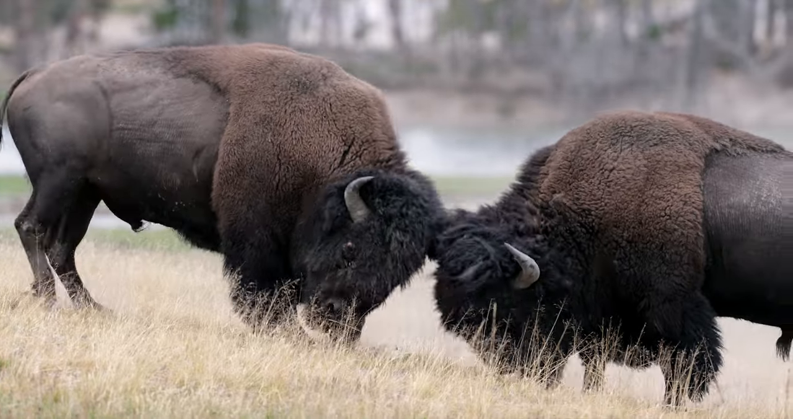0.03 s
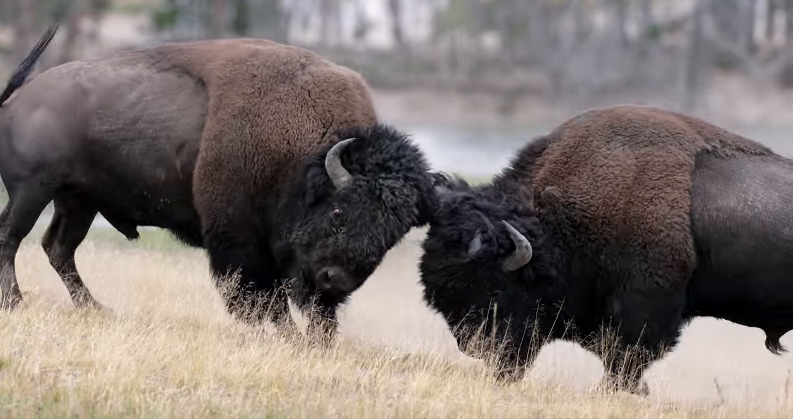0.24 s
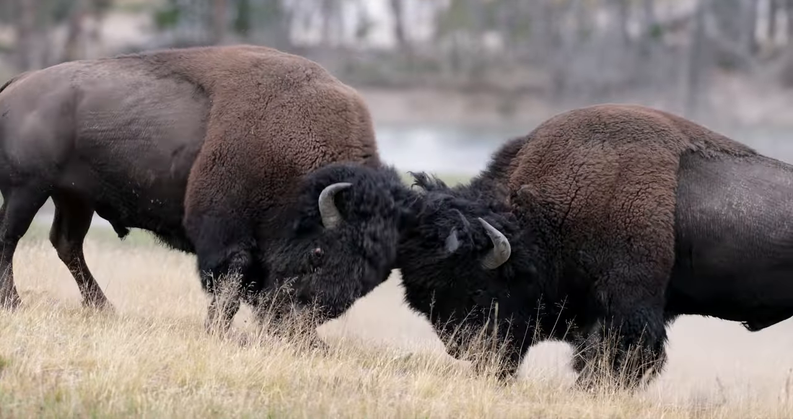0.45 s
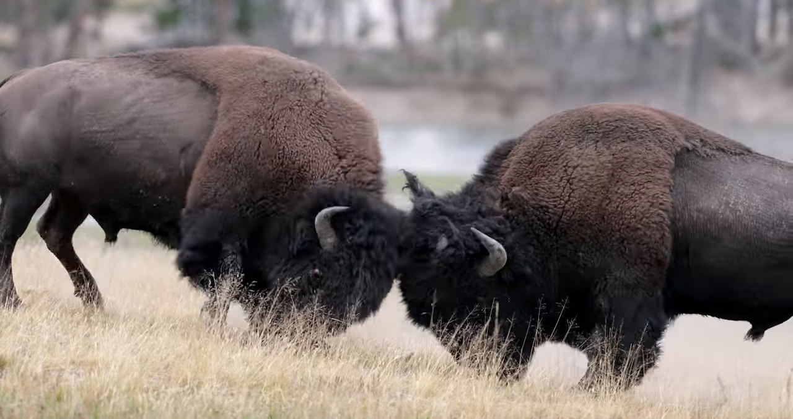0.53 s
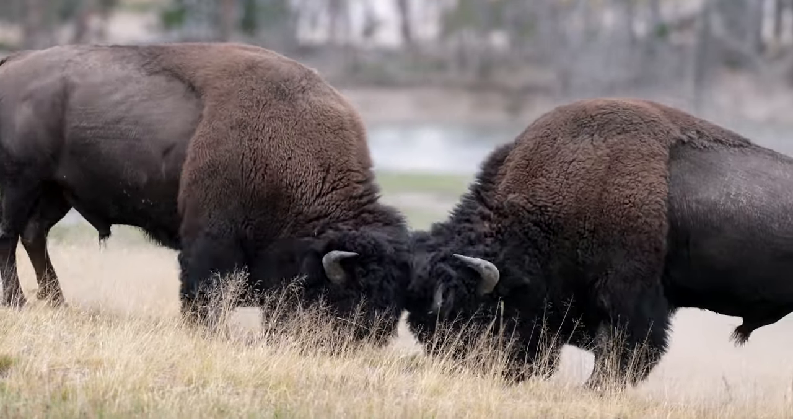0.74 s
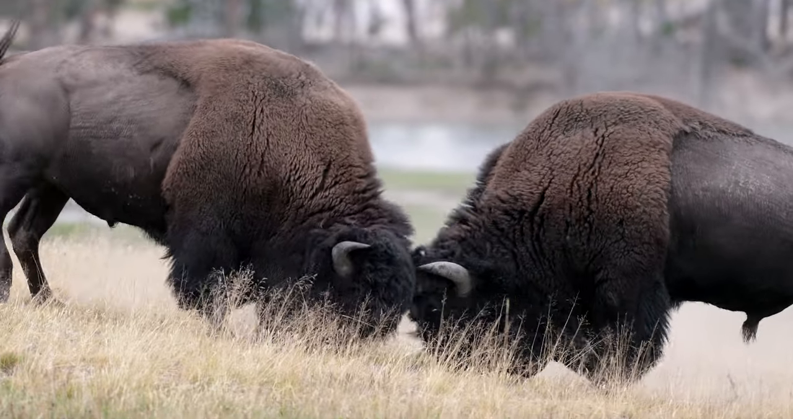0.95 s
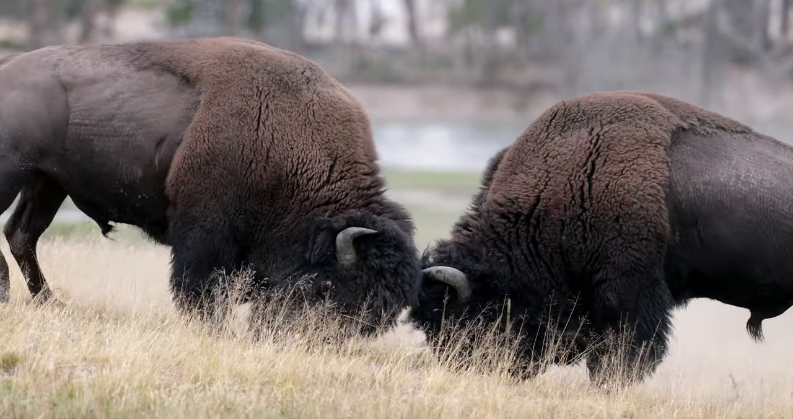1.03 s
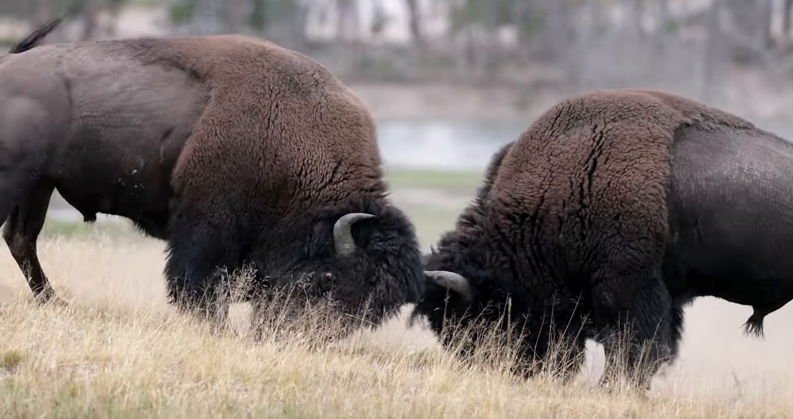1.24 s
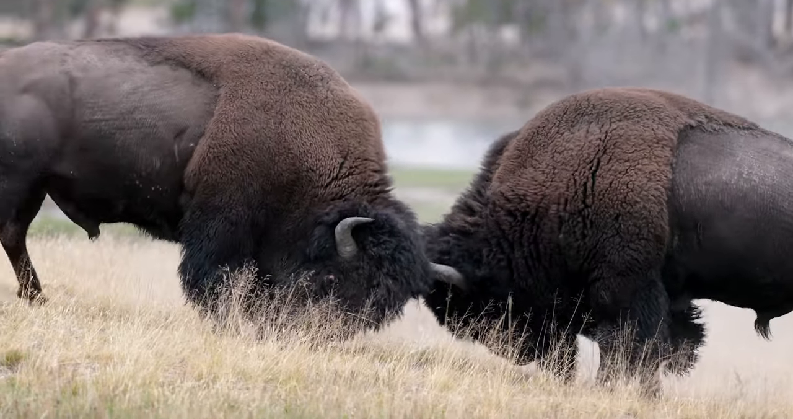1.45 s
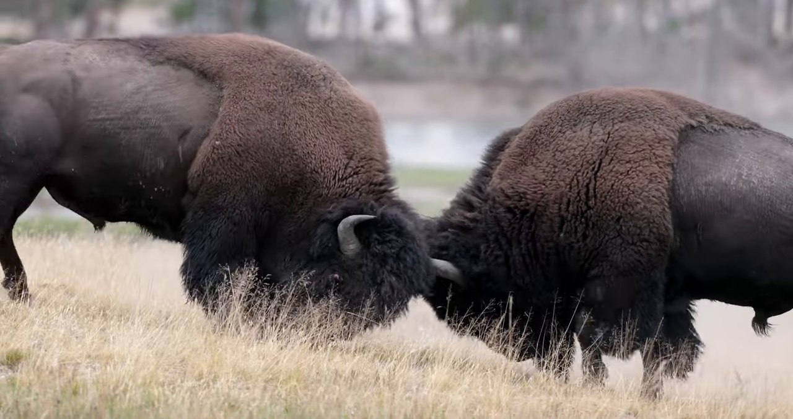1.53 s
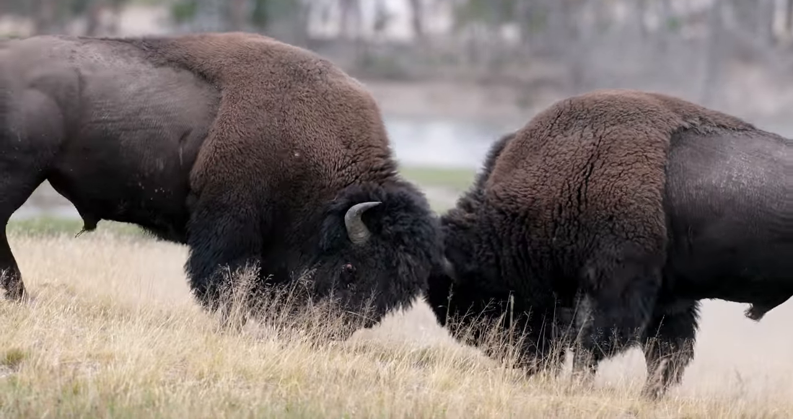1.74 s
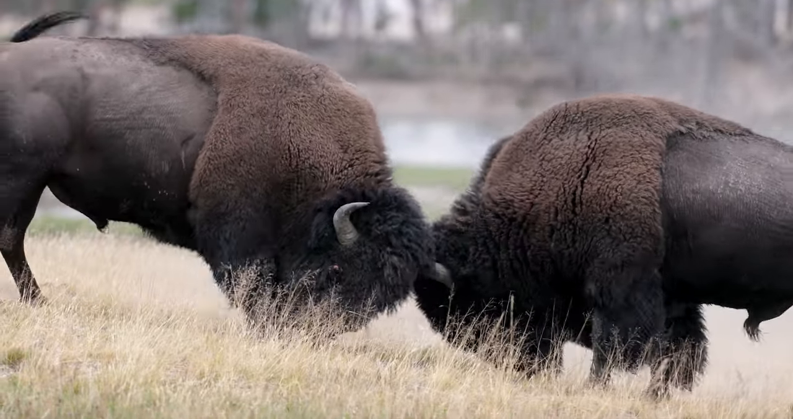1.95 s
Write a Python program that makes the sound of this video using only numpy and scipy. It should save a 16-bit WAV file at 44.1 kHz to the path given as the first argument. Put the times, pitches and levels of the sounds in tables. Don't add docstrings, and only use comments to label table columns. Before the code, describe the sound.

A bull bison bellows once, close and dry: quick nostril snorts, then a deep pulsing growl with breathy hiss, slackening into irregular throat flaps and a faint sigh. Low wind rumbles outdoors; sound only on the left.

```python
import sys
import numpy as np
from scipy import signal
from scipy.fft import rfft, irfft, next_fast_len
from scipy.io import wavfile
from scipy.ndimage import uniform_filter1d, map_coordinates

SR = 44100
rng = np.random.default_rng(int(sys.argv[2]) if len(sys.argv) > 2 else 0)


def digitize_waveform(pressure):
    field = np.atleast_2d(pressure).T
    bounded = np.clip(field, -1, 1)
    quanta = np.round(bounded * 32767).astype(np.int16)
    wavfile.write(sys.argv[1], SR, quanta)


def magnitude_from_level(level_db):
    exponent = np.asarray(level_db, float) / 20
    return 10 ** exponent


N = 88200
TIME = np.arange(N) / SR

# time_s, body_level_db, mouth_level_db, rasp_level_db
VOICE_LEVELS = [(0.03, -71, -43.5, -76), (0.192, -39, -35, -66), (0.28, -30, -28, -56.5),
                (0.354, -26.5, -31, -53.5), (0.414, -18.5, -27, -54.5), (0.482, -23.5, -30, -57),
                (0.556, -17.5, -31, -53), (0.624, -22.5, -28, -56.5), (0.75, -19, -33, -59.5),
                (0.87, -26, -34, -61), (0.974, -24, -33.5, -64), (1.035, -24, -35.5, -63),
                (1.094, -21, -30, -70.5), (1.164, -18.5, -43, -69), (1.3, -28, -39, -69.5)]
# time_s, flaps
FLAP_COUNT = [(.04, 0), (.159, 7), (.311, 16), (.395, 21), (.449, 24), (.513, 28), (.586, 32), (.666, 37),
              (.773, 43), (.853, 48), (.923, 52), (1.003, 57), (1.057, 60), (1.123, 63), (1.222, 68),
              (1.271, 71), (1.318, 73), (2, 105)]
# freq_hz, level_db
RASP_COLOUR = [(3000, -52.5), (4200, -9.5), (5000, -11.5), (6500, -15), (8000, -28.5), (11000, -29),
               (15000, -68)]
SLACKENS_S = 1.36
WINDPIPE_SOFT_HZ = 464
SHIVER_DB = 2.4


def folds():
    jitter = 0.02
    scatter_db, alternate_db = 1.6, 1.6
    leak = 0.6
    body_db, mouth_db, rasp_db = curves(VOICE_LEVELS)
    at = np.flatnonzero(np.diff(np.floor(curves(FLAP_COUNT)[0])))
    at = at[at < VOICE_LEVELS[-1][0] * SR]
    timing_luck, level_luck = rng.standard_normal((2, len(at)))
    shift = np.round(jitter * timing_luck * np.gradient(at)).astype(int)
    pulses = np.zeros(N)
    pulses[at + shift] = magnitude_from_level(scatter_db * level_luck + alternate_db * (-1) ** np.arange(len(at)))

    body = chest(pulses)
    voice = patchy(mouth(puffed(pulses, 6.3)), SHIVER_DB)
    rasp_air = unit(gust(pulses)) + leak * rng.standard_normal(N)
    rasp = patchy(filtered(rasp_air, colour(RASP_COLOUR)), SHIVER_DB)
    layers = zip((body_db, mouth_db, rasp_db), (body, voice, rasp))
    return sum(magnitude_from_level(db) * x / x[SR // 4:SR].std() for db, x in layers)


def ring():
    # start_s, rise_s, fall_s, peak_db
    swells = [(0.054, 0.096, 0.028, -22.5), (0.152, 0.025, 0.046, -25.5), (0.212, 0.059, 0.015, -10),
              (0.27, 0.098, 0.0083, -4), (0.372, 0.0349, 0.017, -3.5), (0.417, 0.025, 0.035, -8.5),
              (0.45, 0.0046, 0.12, -6.5), (0.499, 0.047, 0.032, -7.5), (0.579, 0.038, 0.069, -3.5),
              (0.665, 0.066, 0.047, -3), (0.756, 0.046, 0.061, -5), (0.85, 0.0017, 0.063, -10),
              (0.919, 0.027, 0.13, -6.5), (1.06, 0.0057, 0.11, -8.5), (1.12, 0.027, 0.15, -7),
              (1.272, 0.0067, 0.047, -7), (1.325, 0.03, 0.048, -18), (1.375, 0.0044, 0.039, -16),
              (1.401, 0.0053, 0.037, -10), (1.432, 0.0084, 0.03, -13), (1.466, 0.0053, 0.046, -21.5),
              (1.494, 0.004, 0.035, -14), (1.541, 0.0098, 0.015, -17), (1.568, 0.0097, 0.0093, -26.5),
              (1.588, 0.01, 0.058, -23), (1.631, 0.0062, 0.069, -23.5), (1.702, 0.03, 0.043, -18.5),
              (1.731, 0.013, 0.085, -24), (1.803, 0.0078, 0.058, -20.5), (1.971, 0.0029, 0.029, -27.5)]
    # time_s, pitch_hz
    ring_pitch = [(.05, 200), (.1, 214.5), (.15, 229), (.25, 241), (.36, 241.4), (.48, 246.9), (.58, 236.6),
                  (.72, 232), (.84, 230.6), (.96, 235.3), (1.08, 227.4), (1.2, 234), (1.32, 224.8),
                  (1.44, 233.4), (1.6, 227.6), (1.9, 224)]
    # time_s, level_db
    octave_level = [(0, -36), (1.5, -32.5), (1.58, -21.5), (2, -22)]
    # start_s, length_s, pitch_hz, level_db
    hums = [
        (0.11, 0.031, 705, -35),
        (.174, .03, 676, -31),
    ]
    level = 0
    for start, rise, fall, db in swells:
        up = np.clip((TIME - start) / rise, 0, 1) ** 0.47
        down = np.cos(np.pi / 2 * np.clip((TIME - start - rise) / fall, 0, 1)) ** 2.06
        level = level + magnitude_from_level(db) * up * down * np.exp(1.1j * rng.standard_normal())
    sag = uniform_filter1d(1 + 0.15 * (1 - 2 * (curves(FLAP_COUNT)[0] % 1)), size=130)
    phase = 2 * np.pi * np.cumsum(curves(ring_pitch)[0]) / SR + 0.38 * wobble(40)
    tone = level * sag * np.exp(1j * phase)
    octave = (tone ** 2 / (abs(tone) + 0.011)).imag
    hum = sum(magnitude_from_level(db) * arch(s, length) * np.sin(2 * np.pi * hz * TIME) for s, length, hz, db in hums)
    return filtered(tone.imag, soft(1200)) + magnitude_from_level(curves(octave_level)[0]) * filtered(octave, soft(1300)) + hum


def slaps():
    # time_s, peak_db
    cracks = [(0.087, -35), (0.106, -31.5), (0.158, -34.5), (0.178, -28.5), (0.207, -30.5), (0.231, -23),
              (0.245, -31), (0.28, -29.5), (0.432, -24), (0.532, -28.5), (0.566, -27), (1.003, -37.5),
              (0.395, -37.5), (0.414, -24.5), (0.45, -22.5), (0.48, -21.5), (0.666, -24.5), (0.719, -23.5),
              (0.756, -21.5), (0.851, -23.5), (1.056, -20.5), (1.124, -19), (1.162, -24.5), (1.222, -30.5),
              (1.269, -25), (1.293, -23.5), (1.319, -37), (1.337, -27), (1.374, -22), (1.402, -19.5),
              (1.435, -26), (1.463, -21.5), (1.491, -25.5), (1.527, -27), (1.565, -29.5), (1.708, -45),
              (1.732, -35.5)]
    # freq_hz, width_hz, level_db
    back_throat = [
        (944, 62, 2),
        (1177, 77, -2),
        (550, 90, -8),
    ]
    thump_db, crack_db, rasp_db, knock_db = 0.5, 0.5, -31, -7.5
    hits = np.zeros(N)
    for s, db in cracks:
        hits[round(s * SR)] = magnitude_from_level(db)

    def knocked(x):
        return filtered(x, lambda f: tube(back_throat)(f) * soft(1500)(f))

    def rasped(x):
        return filtered(x, colour(RASP_COLOUR))

    def peak(resonator):
        return abs(resonator(signal.unit_impulse(N, N // 2))).max()

    slack_boost = magnitude_from_level(10 * (TIME > 1.1))
    thump = chest(-hits * slack_boost) / peak(chest)
    crack = patchy(mouth(puffed(hits, 5.67 * 2.29)), SHIVER_DB / 2) / peak(mouth)
    rasp = rasped(gust(hits)) / peak(rasped)
    knock = knocked(hits * (TIME < SLACKENS_S)) / peak(knocked)
    return magnitude_from_level(thump_db) * thump + magnitude_from_level(crack_db) * crack + magnitude_from_level(rasp_db) * rasp + magnitude_from_level(knock_db) * knock


def puffed(pulses, click):
    return click * filtered(pulses, soft(650)) + magnitude_from_level(-9) * gust(pulses)


def gust(pulses):
    puff_s = 0.004
    t = np.arange(SR // 30) / SR
    shape = t / puff_s * np.exp(-2 * t / puff_s)
    level = signal.fftconvolve(lagged(pulses), 2.03 * shape / np.linalg.norm(shape))[:N]
    return level * rng.standard_normal(N)


def lagged(pulses):
    longest_lag_s, spread_db = 0.003, 7.9
    at = np.flatnonzero(pulses)
    lag_luck, size_luck = rng.random((2, len(at)))
    late = np.zeros(N)
    late[at + (longest_lag_s * SR * lag_luck).astype(int)] = pulses[at] * magnitude_from_level(spread_db * (size_luck - 0.5))
    return late


def chest(x):
    # freq_hz, width_hz, level_db
    chest_modes = [
        (256.8, 68, 1),
        (114, 129, -5),
        (414.4, 31, -14),
    ]
    low_cut_hz = 74
    return filtered(x, lambda f: tube(chest_modes)(f) * soft(WINDPIPE_SOFT_HZ)(f)
                    * (1j * f / (low_cut_hz + 1j * f)) ** 2)


def mouth(x):
    # freq_hz, width_hz, level_db
    shut = [(584, 22, -15), (914, 58, 2), (1150, 100, -1.5), (1338, 83, 1), (1700, 150, -6),
            (1776, 53, 0.5), (2050, 150, -7.5), (2430, 54, -7), (2636, 65, -18), (2994, 160, -12),
            (4700, 1200, -51.5)]
    # freq_hz, width_hz, level_db
    wide = [(549, 33, -1), (919, 47, 7.5), (1146, 119, 6.5), (1447, 156, 1.5), (1597.4, 26.7, 8.5),
            (1778, 90.5, 4), (1982, 177, -1), (2290, 210, -5), (2590, 140, -6), (2773, 130, -6.5),
            (3140, 170, -13), (3480, 170, -16), (5330, 580, -33), (5270, 1600, -46.5)]
    # freq_hz, width_hz, level_db
    slack = [(538, 16, -12.5), (893, 48, -8), (1220, 57, -2.5), (1540, 140, 0.5), (1910, 167, -2),
             (2300, 170, -4.5), (2620, 150, -5.5), (3010, 150, -9), (5310, 900, -51.5)]
    # freq_hz, level_db
    lips = [(300, 7.5), (1000, -5.5), (3300, 1.5), (3900, -9), (4600, 4), (7500, -9.5), (12000, -13.5)]
    opens_s, glide_s = 0.32, 0.1
    opened, slackened = [np.clip((TIME - s) / glide_s + 0.5, 0, 1) for s in (opens_s, SLACKENS_S)]
    shapes = zip((shut, wide, slack), (1 - opened, opened - slackened, slackened))
    throat = sum(filtered(x * share, tube(peaks)) for peaks, share in shapes)
    return filtered(throat, colour(lips))


def breath():
    # time_s, level_db
    breath_level = [(0, -58.5), (.09, -43.5), (.14, -44.5), (.2, -29), (.4, -32), (.75, -34.5),
                    (.95, -32.5), (1.1, -34.5), (1.3, -36.5), (1.45, -36.5), (1.53, -39), (1.58, -34.5),
                    (1.635, -52), (1.68, -59), (1.84, -58), (2, -77)]
    # freq_hz, width_hz, level_db
    windpipe = [(234, 93, 0)]
    chop_db, pipe_db = 10, -0.5
    level = magnitude_from_level(curves(breath_level)[0] + 1.4 * wobble(34.92) + 0.68 * wobble(15.4))
    voiced = TIME < VOICE_LEVELS[-1][0]
    chop = uniform_filter1d(magnitude_from_level(-chop_db * (curves(FLAP_COUNT)[0] % 1 - 0.5) * voiced), size=60)
    throat_air = patchy(mouth(chop * rng.standard_normal(N)), SHIVER_DB)
    pipe_air = filtered(rng.standard_normal(N), lambda f: tube(windpipe)(f) * soft(WINDPIPE_SOFT_HZ)(f))
    return level * (unit(throat_air) + magnitude_from_level(pipe_db) * unit(pipe_air))


def nose():
    # start_s, length_s, level_db
    snorts = [
        (0.153, 0.068, -38.5),
        (0.204, 0.014, -23.5),
        (0.231, 0.031, -28.5),
        (.245, 0.013, -31.5),
        (0.261, 0.025, -25.5),
        (.307, 0.02, -27.5),
        (1.588, 0.05, -37),
    ]
    # freq_hz, width_hz, level_db
    nostril = [(1851, 243, 2), (2055, 160, 1.5), (1670, 200, -9)]
    # freq_hz, level_db
    sigh_colour = [(150, -12), (300, -2), (900, 2.5), (1400, -5), (2000, -6), (2450, -2), (3000, -17),
                   (4500, -47.5)]
    puffs = sum(magnitude_from_level(db) * arch(s, length) for s, length, db in snorts)
    air = filtered(rng.standard_normal(N), lambda f: tube(nostril)(f) * soft(3000)(f))
    sigh_level = magnitude_from_level(-51 + 1.89 * wobble(40)) * arch(1.835, 0.2) ** 0.5
    sigh = sigh_level * unit(filtered(rng.standard_normal(N), colour(sigh_colour)))
    return puffs * unit(air) + sigh


def wind():
    # freq_hz, level_db (per Hz)
    rumble_colour = [(15, 4.5), (30, -9.5), (60, -3), (120, 0), (250, -1), (500, -25), (1500, -23.5),
                     (4000, -56)]
    # time_s, level_db
    wind_level = [(0, -46), (.2, -39), (.8, -43.5), (1.4, -34.5), (1.7, -36), (2, -38)]
    level = magnitude_from_level(curves(wind_level)[0] + 1.9 * wobble(7.86) + 0.84 * wobble(27))
    return level * unit(filtered(rng.standard_normal(N), colour(rumble_colour)))


def unit(x):
    return x / np.sqrt(np.mean(x ** 2) + 1e-20)


def curves(rows):
    s, *cols = np.transpose(rows)
    return [np.interp(TIME, s, c) for c in cols]


def wobble(rate):
    knots = rng.standard_normal(int(N * rate / SR) + 4)
    return map_coordinates(knots, [TIME * rate])


def arch(start, length):
    progress = np.clip((TIME - start) / length, 0, 1)
    return uniform_filter1d(abs(np.sin(np.pi * progress ** 0.5)), size=70)


def filtered(x, response):
    m = next_fast_len(N + SR // 2)
    return irfft(rfft(x, m) * response(np.fft.rfftfreq(m, 1 / SR)), m)[..., :N]


def colour(points):
    f, v = np.transpose(points)
    return lambda hz: magnitude_from_level(np.interp(np.log(hz + 1), np.log(f + 1), v))


def tube(peaks):
    return lambda f: sum((-1) ** k * magnitude_from_level(db) * 1j * f * w / (c * c - f * f + 1j * f * w)
                         for k, (c, w, db) in enumerate(peaks))


def soft(hz):
    return lambda f: 1 / (1 + 1j * f / hz) ** 2


def patchy(x, depth_db):
    z = signal.stft(x, nperseg=256)[2]
    field = uniform_filter1d(rng.standard_normal(z.shape), size=3, axis=0)
    field = uniform_filter1d(field, size=4, axis=1)
    return signal.istft(z * magnitude_from_level(depth_db * unit(field)), nperseg=256)[1][:N]


def scene():
    left = folds() + ring() + slaps() + breath() + nose() + wind()
    return np.array([left, np.zeros(N)])


def band_limit(x):
    return signal.sosfilt(signal.butter(12, 15890, fs=SR, output="sos"), x)


def record(dry):
    ceiling = 0.9
    hiss = magnitude_from_level(-66.5) * rng.standard_normal((2, N))
    drift = magnitude_from_level(-72.5) * np.array([wobble(30), wobble(30)])
    limited = dry / (1 + abs(dry / ceiling) ** 6) ** (1 / 6)
    return band_limit(limited + hiss + drift)


dry = scene()
out = record(dry)
digitize_waveform(out)
```